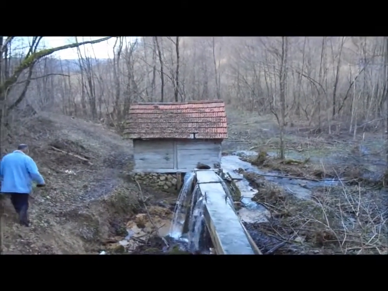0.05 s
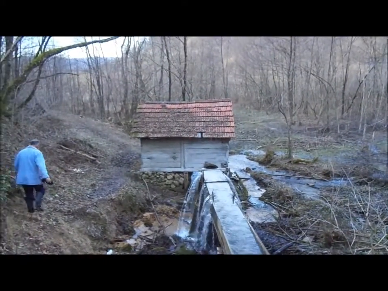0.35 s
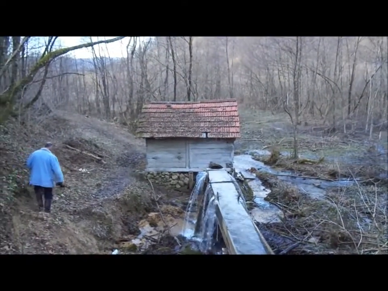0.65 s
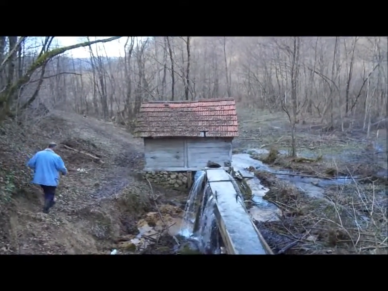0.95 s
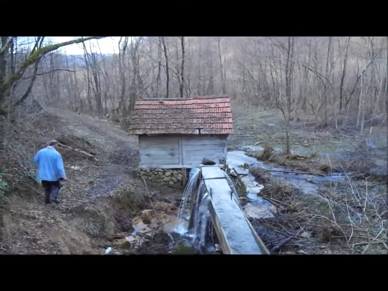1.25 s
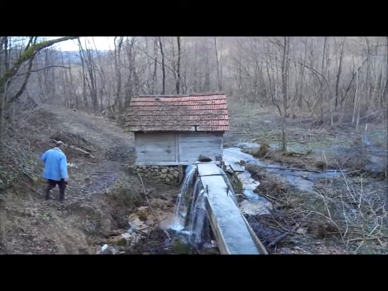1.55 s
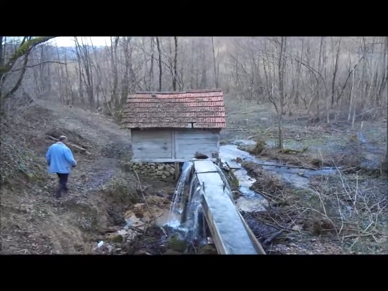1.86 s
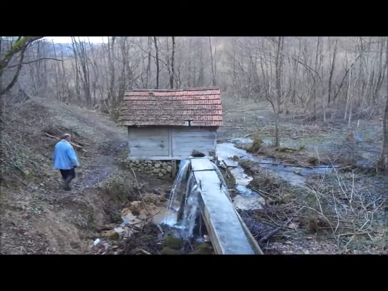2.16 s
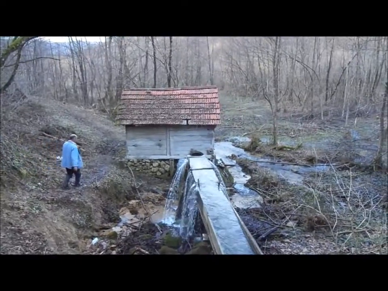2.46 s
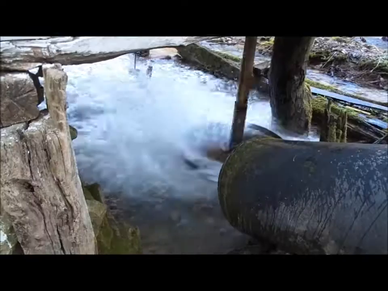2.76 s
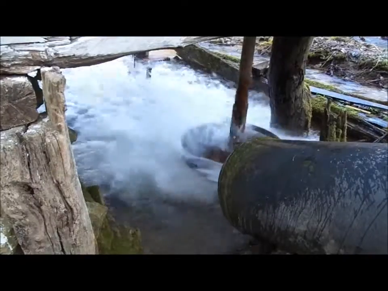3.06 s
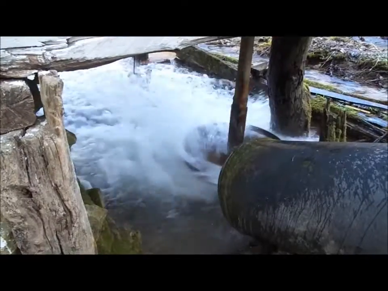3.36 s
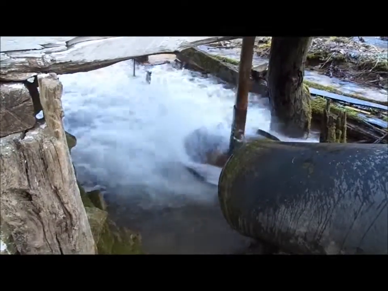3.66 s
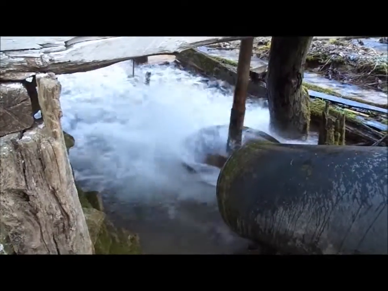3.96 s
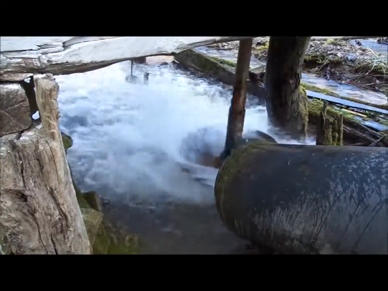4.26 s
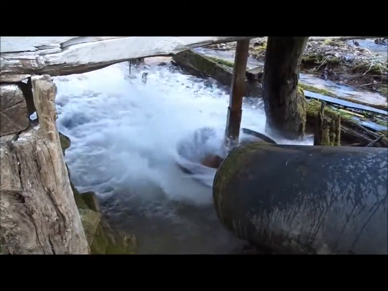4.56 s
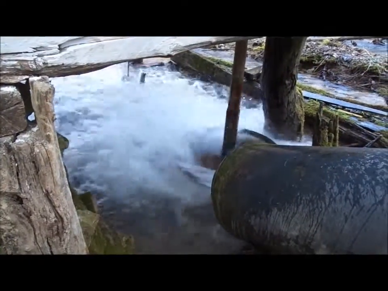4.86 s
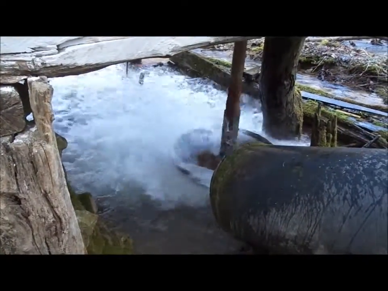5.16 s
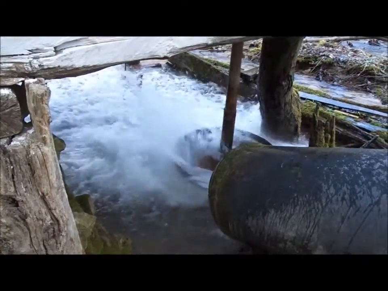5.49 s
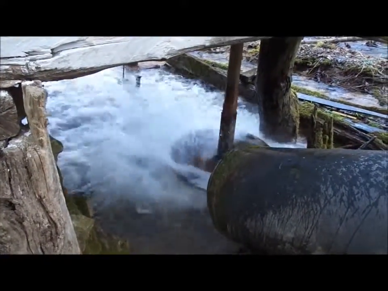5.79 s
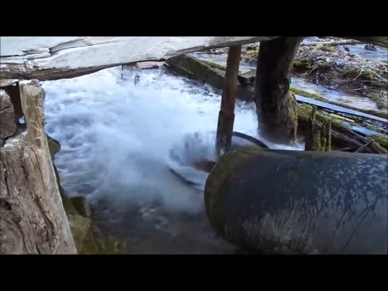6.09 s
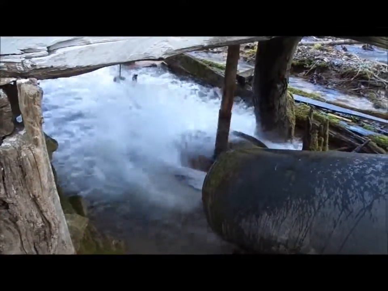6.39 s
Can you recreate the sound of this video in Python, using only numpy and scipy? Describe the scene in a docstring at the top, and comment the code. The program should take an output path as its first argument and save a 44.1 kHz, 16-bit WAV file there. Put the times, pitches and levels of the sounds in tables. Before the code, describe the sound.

From a woodland path, a mill's overflow makes a soft, even rush with fine splashes, broken by three short, dry twig cracks. The sound cuts to a brief silence. Then, much louder and wider, water from a pipe churns a pool right by the microphone, with dense, hollow bubbles and a hiss of spray. It runs steadily to the end, with a faint wind rumble and several low thumps on the microphone.

```python
"""Water spilling over the wooden flume of a small mill in a wood, heard from the bank; twigs snap on the path.
After half a second of silence, the pool under the mill up close: the jet from the pipe churns it,
bubbles ring in the hollow, and air and a few dull bumps touch the microphone.
Water is patchy noise plus ringing bubbles; a twig is a short ring, a knock and a splinter burst."""
import sys
import numpy as np
from scipy import signal
from scipy.fft import rfft, irfft, next_fast_len
from scipy.io import wavfile
from scipy.ndimage import uniform_filter1d, map_coordinates

SR = 44100
rng = np.random.default_rng(int(sys.argv[2]) if len(sys.argv) > 2 else 0)


def unload_audio(sound):
    """Save the sound as a 16-bit wav file, at the path given as the first command line argument."""
    columns = np.transpose(np.atleast_2d(sound))
    # keep every value between -1 and 1, then stretch to whole-number steps
    steps = np.round(np.clip(columns, -1, 1) * 32767)
    wavfile.write(sys.argv[1], SR, steps.astype(np.int16))


N = 283563

# fade of the bank scene: time_s, gain
BANK_FADE = [(-1, 0), (0, 1), (2.248, 1), (2.268, 0)]


def amp(db):
    """Decibels to gain."""
    return 10 ** (np.asarray(db) / 20)


def unit(x):
    """Scale to rms 1."""
    return x / np.sqrt(np.mean(x ** 2) + 1e-20)


def along(points, hz):
    """Read (hz, value) points on a log frequency axis."""
    knots_hz, values = np.transpose(points)
    return np.interp(np.log(hz + 1), np.log(knots_hz + 1), values)


def envelope(points):
    """Read (time_s, gain) points at every sample."""
    times_s, gains = np.transpose(points)
    return np.interp(np.arange(N) / SR, times_s, gains)


def wobble(rate_hz):
    """Smooth random curve, rate_hz knots a second."""
    knots = rng.standard_normal(int(N * rate_hz / SR) + 4)
    return map_coordinates(knots, [np.arange(N) * rate_hz / SR])


def filtered(x, response):
    """Apply the frequency response response(hz)."""
    n_fft = next_fast_len(N + SR // 4)
    return irfft(rfft(x, n_fft) * response(np.fft.rfftfreq(n_fft, 1 / SR)), n_fft)[..., :N]


def coloured(x, colour, resonances=()):
    """Apply a broad spectrum and the lift or dip of each resonance."""
    def response(hz):
        lift_db = sum(db / (1 + (2 * (hz - centre_hz) / width_hz) ** 2)
                      for centre_hz, width_hz, db in resonances)
        return amp(along(colour, hz) + lift_db)
    return filtered(x, response)


def split(x, edge_hz):
    """Water body below the edge and spray above, each at rms 1."""
    body = filtered(x, lambda hz: 1 / (1 + (hz / edge_hz) ** 10))
    return unit(body), unit(x - body)


def widen(mid, width_db):
    """Near-mono stereo: a weak random-phase side part, offset by width_db."""
    # side spectrum relative to mid: freq_hz, gain_db
    side_colour = [(50, -19), (250, -18), (700, -23.5), (1200, -27), (2300, -19), (7000, -13),
                   (13000, -18.5)]
    def scatter(hz):
        return amp(along(side_colour, hz) + width_db) * np.exp(2j * np.pi * rng.random(len(hz)))
    side = filtered(mid, scatter)
    return np.array([mid + side, mid - side])


def draught(floor_db=-50):
    """A light draught rumbles on the microphone and swells in puffs."""
    # rumble spectrum: freq_hz, gain_db
    colour = [(15, -14), (40, -1), (85, 6), (140, -9), (300, -7.5), (1000, -60)]
    # puffs of air: crest_s, level_db, half_length_s
    puffs = [(3.87, -42, .07), (4.3, -33, 0.077), (4.7, -46.5, 0.17), (4.98, -42, 0.066), (5.45, -36, .06),
             (5.796, -43, .09)]
    t = np.arange(N) / SR
    puff_power = sum(amp(db) ** 2 * np.exp(-((t - crest_s) / half_s) ** 2)
                     for crest_s, db, half_s in puffs)
    air = coloured(rng.standard_normal(N), colour)
    return np.sqrt(amp(floor_db) ** 2 + puff_power) * unit(air * amp(2.5 * wobble(15)))


def bumps():
    """Each bump is one low pressure push with a rebound on both sides and no ring."""
    # bumps on the microphone: time_s, peak_db, centre_hz
    pushes = [(3.89, -26, 100), (4.285, -25, 95), (4.304, -17, 190), (4.309, -18, 109), (4.391, -21, 180),
              (4.405, -17, 200), (5.463, -18, 145)]
    t, pressure = np.arange(N) / SR, np.zeros(N)
    for time_s, peak_db, centre_hz in pushes:
        phase_sq = (np.pi * centre_hz * (t - time_s)) ** 2
        pressure += amp(peak_db) * (1 - 2 * phase_sq) * np.exp(-phase_sq)
    return pressure


def litter(count, level_db=-23.5, spread_db=1.5, ring_hz=3200, t60_s=0.0043):
    """Dry litter ticks faintly at random times in the bank scene; returns snap rows for twigs()."""
    walk_s = BANK_FADE[-1][0]
    return [(walk_s * when, level_db + spread_db * (2 * size - 1),
             ring_hz * 2 ** ((pitch - .5) / 2), t60_s, -19, -18)
            for when, size, pitch in rng.random((count, 3))]


def twigs(knock_hz=620, knock_t60_s=.012):
    """Each snap is a very short ring, a knock on the ground and a burst of splintering fibres."""
    # snapping twigs: start_s, ring_db, ring_hz, t60_s, knock_re_ring_db, splinter_re_ring_db; the row at 0.8378
    # s is the first snap echoing off the ground 3.4 ms later
    snaps = [(0.8344, -14, 2320, .006, -11, -8.5), (0.8378, -25, 3200, .005, -14, -12),
             (1.8297, -13, 3150, .006, -9, -24), (2.1455, -8.5, 3890, 0.0025, -24, -12.5),
             (2.16, -19, 2400, .004, -18, -17), (2.1791, -17, 3300, 0.0068, -32, -20)]
    # splinter spectrum: freq_hz, gain_db
    colour = [(300, -34.5), (1200, -11), (2200, 3.5), (5500, 2.5), (8000, -15), (15000, -24)]
    wood, bursts = np.zeros(N), np.zeros(N)
    t = np.arange(SR // 20) / SR
    burst = amp(-60 * t / 0.0034) + amp(-9 - 60 * t / .04)  # crack plus tail
    for start_s, ring_db, ring_hz, t60_s, knock_db, splinter_db in snaps + litter(count=12):
        ring = np.sin(2 * np.pi * ring_hz * t) * amp(-60 * t / t60_s)
        knock = np.sin(2 * np.pi * knock_hz * t) * amp(knock_db - 60 * t / knock_t60_s)
        start = round(start_s * SR)
        wood[start:][:len(t)] += amp(ring_db) * (ring + knock)
        bursts[start:][:len(t)] += amp(ring_db + splinter_db) * burst
    fibres = bursts * unit(coloured(rng.standard_normal(N), colour))
    low_cut = signal.butter(2, 450, "highpass", fs=SR, output="sos")  # thin wood radiates no bass
    return signal.sosfilt(low_cut, wood + fibres)


def rush(patchy_db):
    """Countless merged splashes: white noise with brief patches of random gain."""
    spectra = signal.stft(rng.standard_normal(N), nperseg=512)[2]
    patches = uniform_filter1d(rng.standard_normal(spectra.shape), 9, axis=0)
    patches = unit(uniform_filter1d(patches, 7, axis=1))
    return unit(signal.istft(spectra * amp(patchy_db * patches), nperseg=512)[1][:N])


def bubbles(low_hz, high_hz, cycles, spread_db, rise, count):
    """Damped rings rising in pitch, on average as strong per Hz as unit white noise."""
    when, pitch, size = rng.random((count, 3)).T[:, :, None]
    hz = low_hz * (high_hz / low_hz) ** pitch
    offsets = np.arange(int(min(3 * cycles / low_hz * SR, 900)))
    age = offsets / SR * hz / cycles  # in decay time constants
    phase = 2 * np.pi * cycles * age * (1 + rise * np.minimum(age, 4) / 2)
    ring = np.sin(phase) * np.exp(-age) * (1 - np.exp(-10 * age))
    # small bubbles are brief, so they peak higher
    strength = hz * amp(spread_db * np.minimum(-np.log(1 - size), 4))
    samples = (when * N).astype(int) + offsets
    sound = np.bincount(samples.ravel(), (strength * ring).ravel(), N)[:N]
    return unit(sound) * np.sqrt(abs(high_hz - low_hz) / (SR / 2))


def flume(body_db=-34, spray_db=-38.5):
    """Water spills steadily off the flume onto stones: a soft rush with gurgles and fine drops."""
    # spill spectrum: freq_hz, gain_db
    colour = [(30, -29.5), (70, -20), (130, -11.5), (270, -5), (350, -3.5), (470, -9), (750, -0.5),
              (1000, 1.5), (1900, -5), (3000, -7.5), (4500, -11.5), (7500, -17.5), (12000, -18.5),
              (15000, -27.5)]
    # flume and splash resonances: centre_hz, width_hz, lift_db
    resonances = [(1540, 160, 1), (2780, 300, 2.5), (5430, 400, 3), (6160, 450, 3.5)]
    gurgles = bubbles(low_hz=279.8, high_hz=2997, cycles=12.0, spread_db=2.5, rise=0.054, count=4500)
    drops = bubbles(low_hz=1800, high_hz=6000, cycles=1.8, spread_db=3.5, rise=.03, count=5000)
    water = rush(patchy_db=0.84) + amp(-7.0) * gurgles + amp(-4.5) * drops
    body, spray = split(coloured(water, colour, resonances), edge_hz=2180)
    surge = amp(0.23 * wobble(25))
    body *= amp(body_db + 0.18 * wobble(5.4))
    spray *= amp(spray_db + .1 * wobble(6))
    return surge * (body + spray)


def jet(body_db=-20, spray_db=-23.5):
    """The jet drives air into the pool: dense bubbles ring in the hollow under a hiss of spray."""
    # churn spectrum: freq_hz, gain_db
    colour = [(40, -38), (140, -11), (260, -10), (430, -5.5), (560, -3), (800, -0.5), (1300, 0),
              (1650, -5.5), (2700, -5), (4000, -10), (7000, -16.5), (12000, -20), (13500, -21.5),
              (15000, -30)]
    # resonances of the hollow under the mill: centre_hz, width_hz, lift_db
    hollow = [(341.6, 32, 6), (450, 27, -2), (526, 34, 4.5), (672, 43, 1.5), (946, 94, -3.5),
              (1150, 75, 2.5), (1260, 75, 0.3), (1910, 150, 4)]
    gurgles = bubbles(low_hz=277.7, high_hz=2228, cycles=5.2, spread_db=2.5, rise=0.028, count=5000)
    drops = bubbles(low_hz=1730, high_hz=13200, cycles=1.24, spread_db=1.0, rise=0.042, count=12000)
    water = rush(patchy_db=1) + amp(-5.5) * gurgles + amp(-12.5) * drops
    body, spray = split(coloured(water, colour, hollow), edge_hz=1980)
    surge = amp(0.17 * wobble(45))
    body *= amp(body_db + 0.14 * wobble(7.6))
    spray *= amp(spray_db + .1 * wobble(6))
    return surge * (body + spray)


def scene():
    """The bank, a short silence, then the pool."""
    # fade-in of the pool scene: time_s, gain
    pool_fade = [(2.792, 0), (2.794, 1)]
    bank = widen(flume() + twigs(), width_db=-27)
    pool = widen(jet() + draught() + bumps(), width_db=-2.0)
    return envelope(BANK_FADE) * bank + envelope(pool_fade) * pool


def record(dry):
    """Steep low-pass on the highest treble."""
    cutoff_hz = 15100
    return filtered(dry, lambda hz: 1 / (1 + (hz / cutoff_hz) ** 500))


dry = scene()
out = record(dry)
unload_audio(out)
```